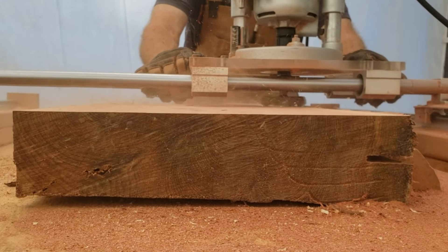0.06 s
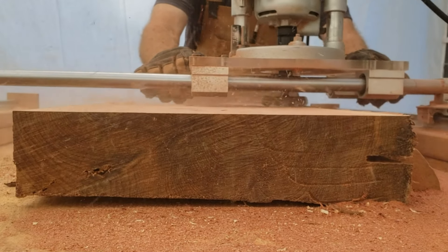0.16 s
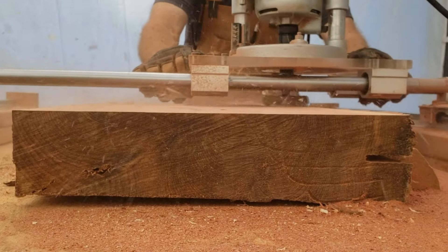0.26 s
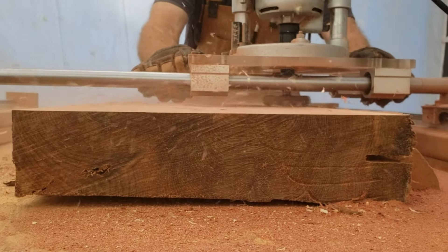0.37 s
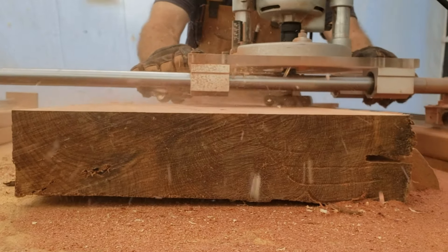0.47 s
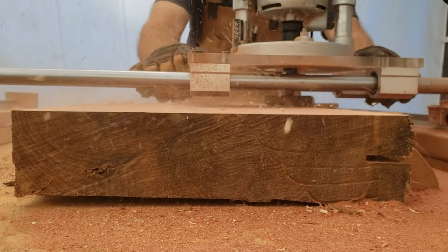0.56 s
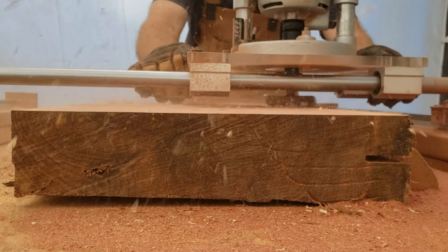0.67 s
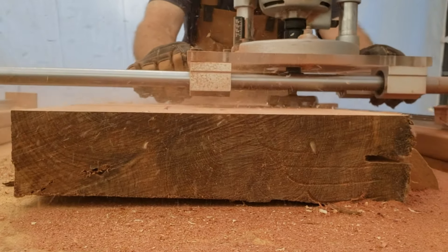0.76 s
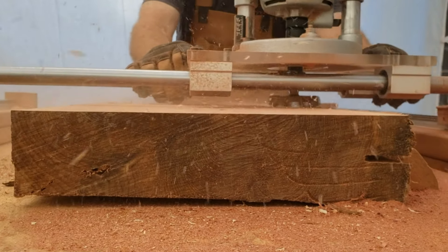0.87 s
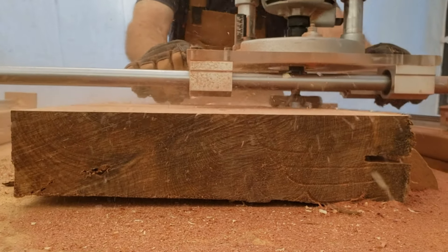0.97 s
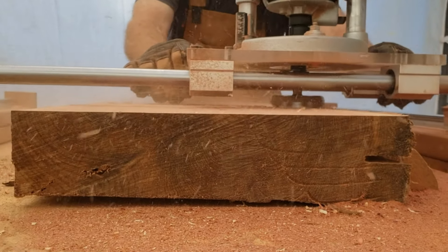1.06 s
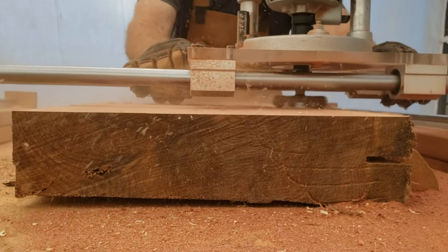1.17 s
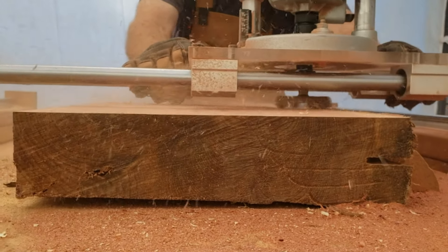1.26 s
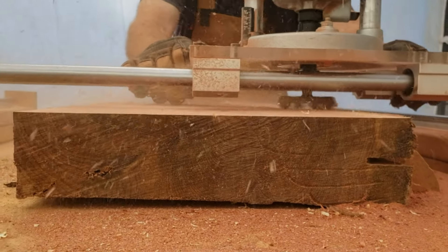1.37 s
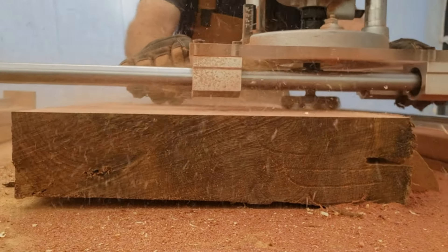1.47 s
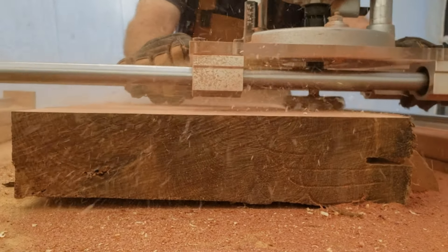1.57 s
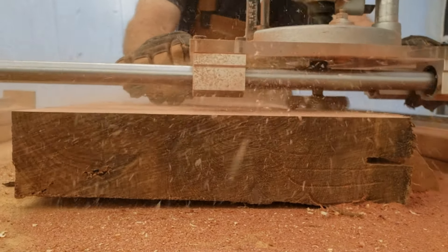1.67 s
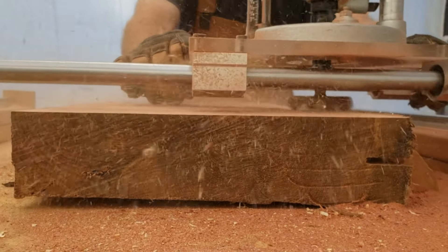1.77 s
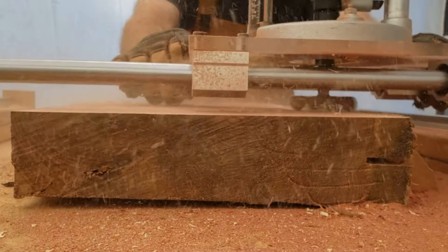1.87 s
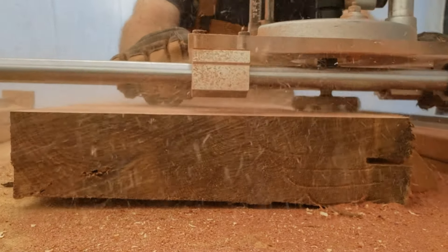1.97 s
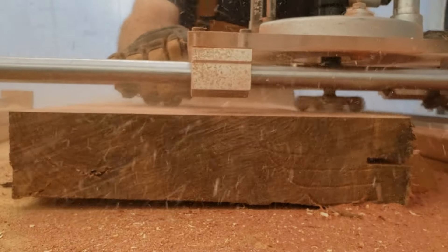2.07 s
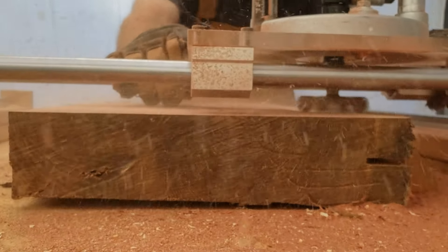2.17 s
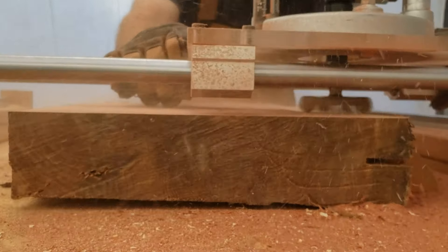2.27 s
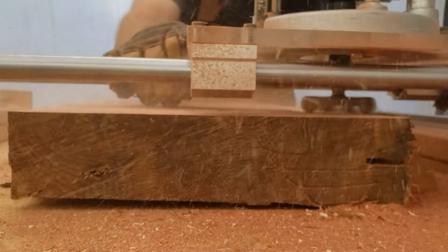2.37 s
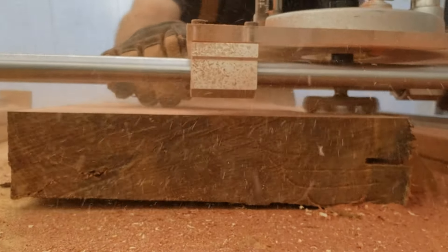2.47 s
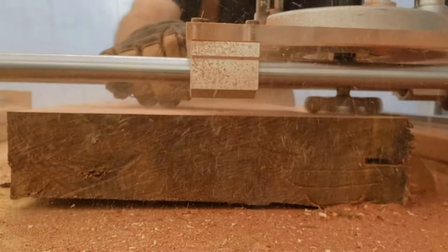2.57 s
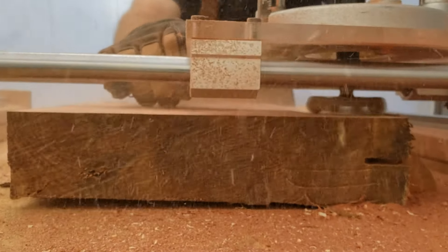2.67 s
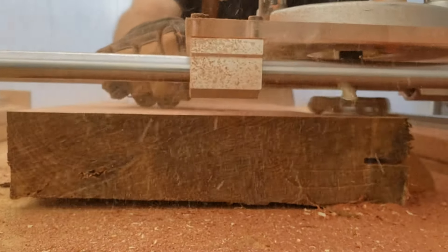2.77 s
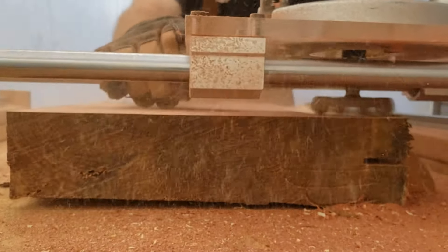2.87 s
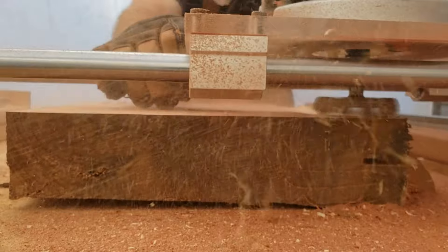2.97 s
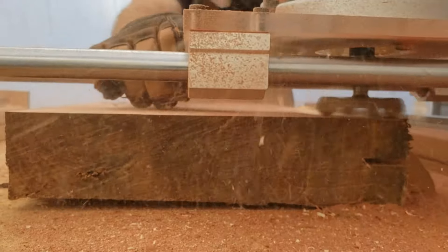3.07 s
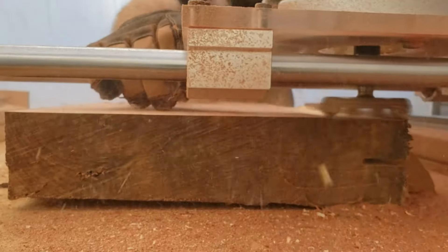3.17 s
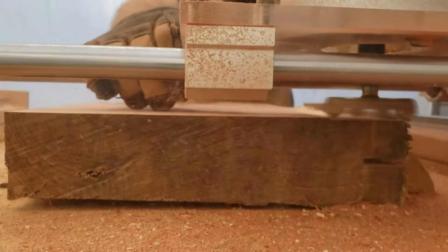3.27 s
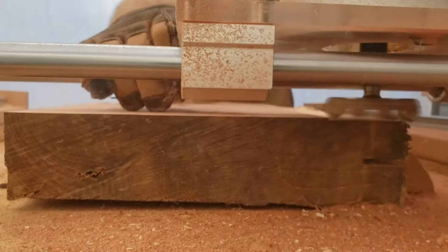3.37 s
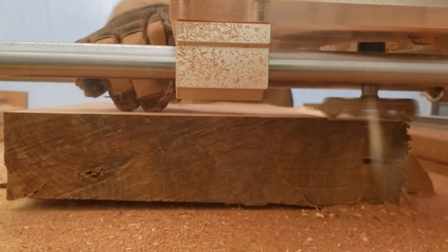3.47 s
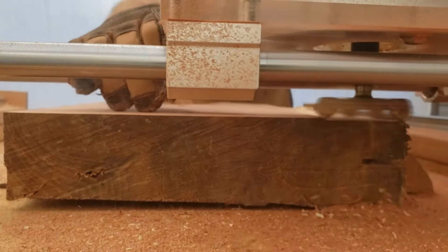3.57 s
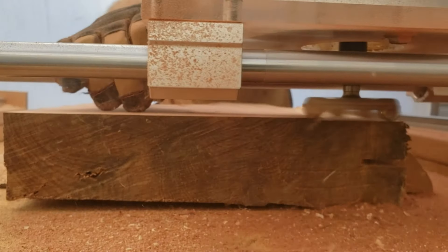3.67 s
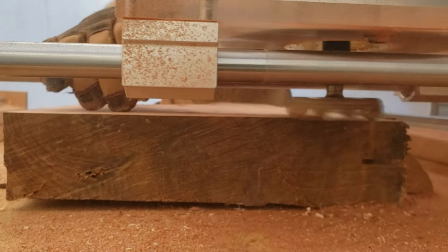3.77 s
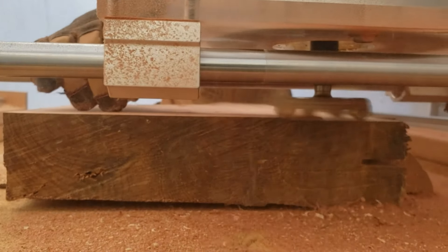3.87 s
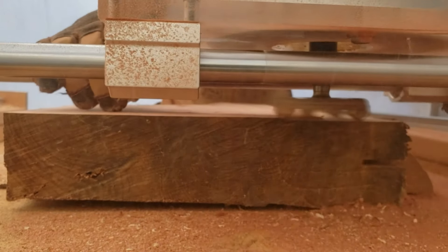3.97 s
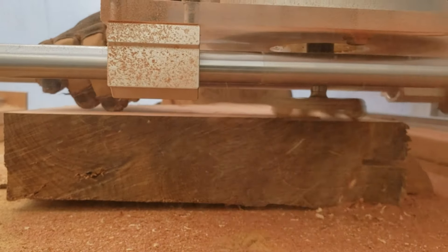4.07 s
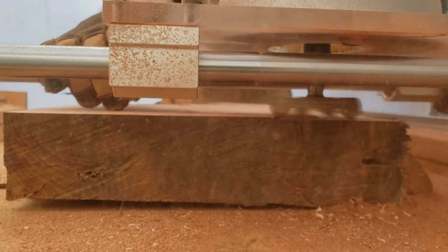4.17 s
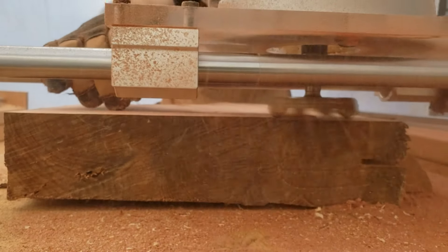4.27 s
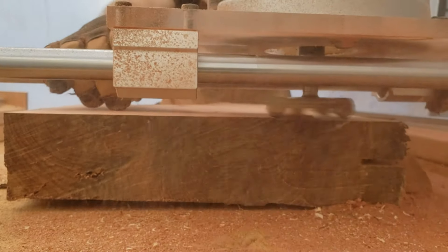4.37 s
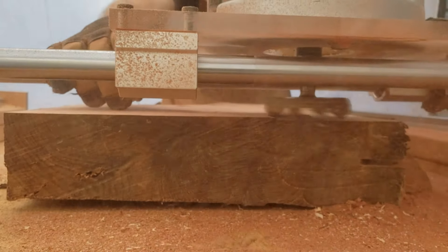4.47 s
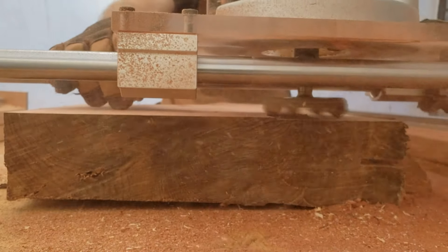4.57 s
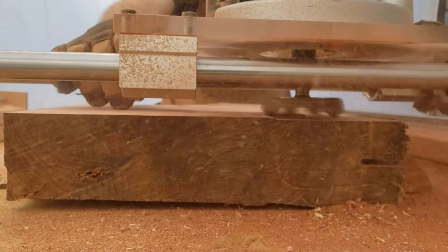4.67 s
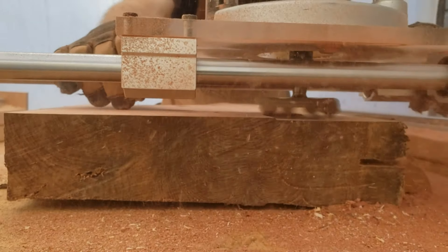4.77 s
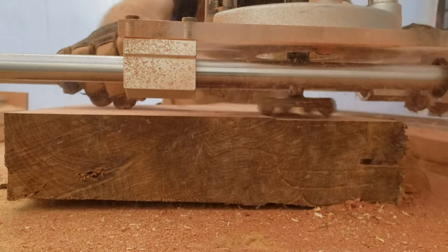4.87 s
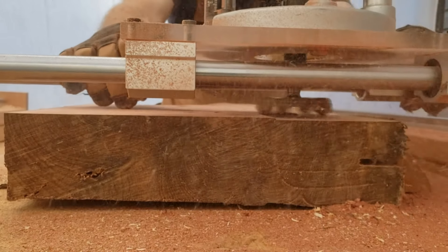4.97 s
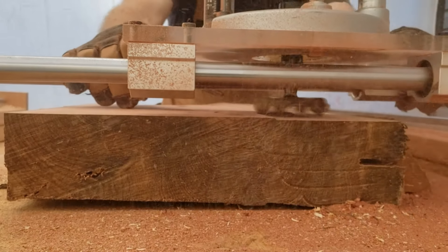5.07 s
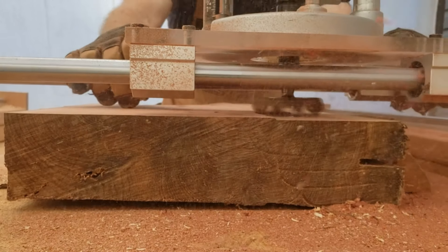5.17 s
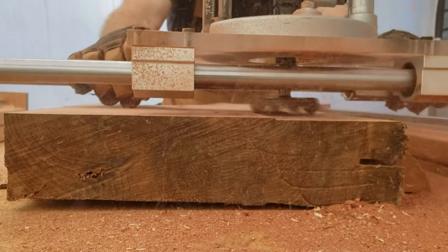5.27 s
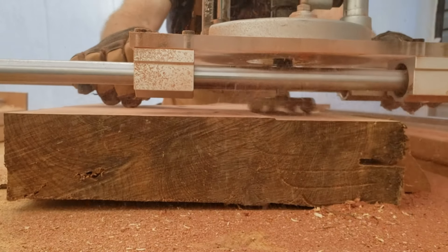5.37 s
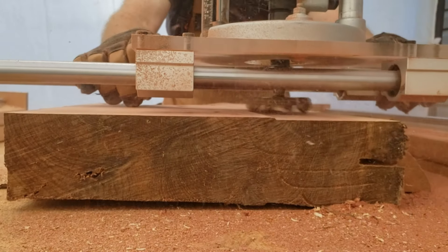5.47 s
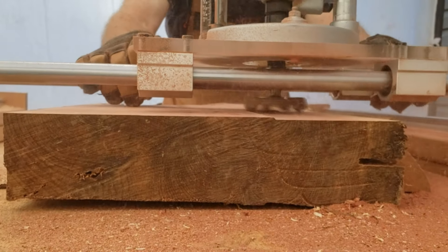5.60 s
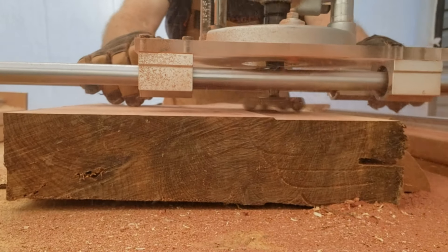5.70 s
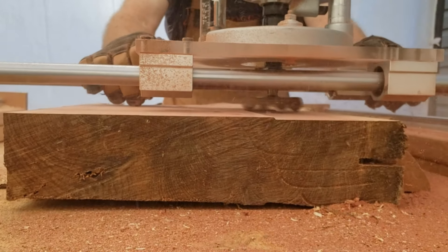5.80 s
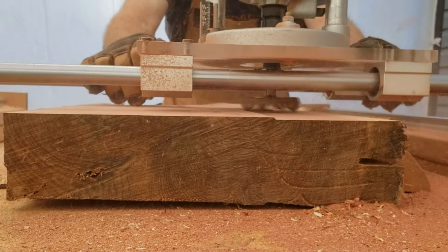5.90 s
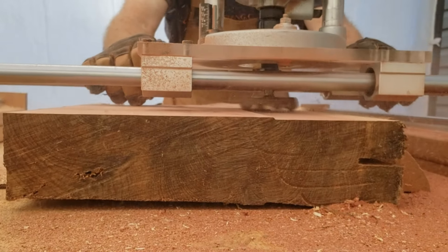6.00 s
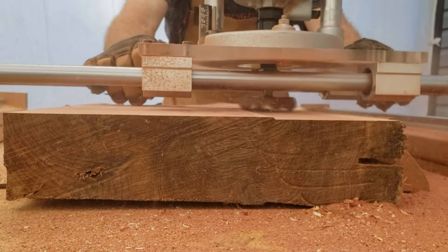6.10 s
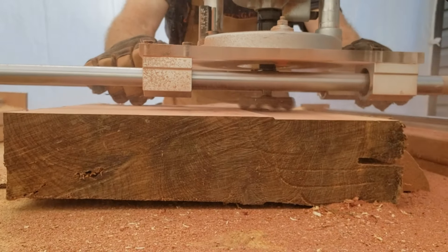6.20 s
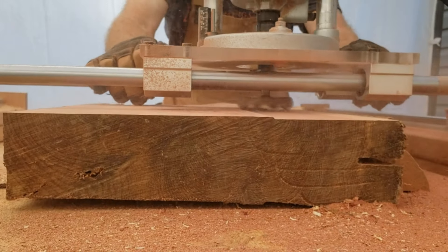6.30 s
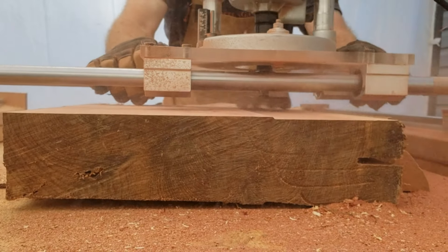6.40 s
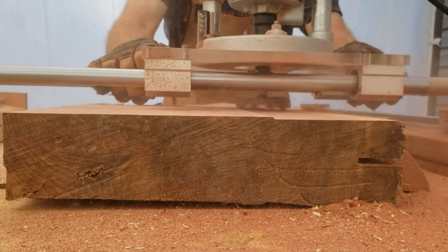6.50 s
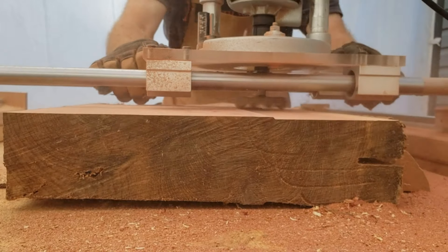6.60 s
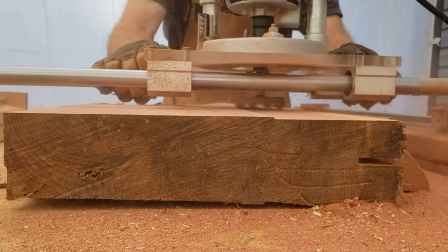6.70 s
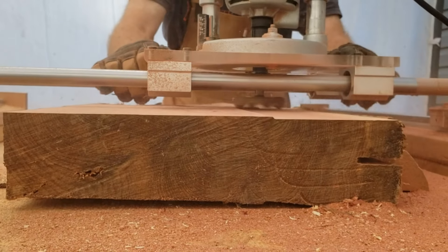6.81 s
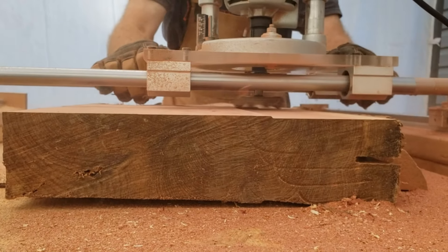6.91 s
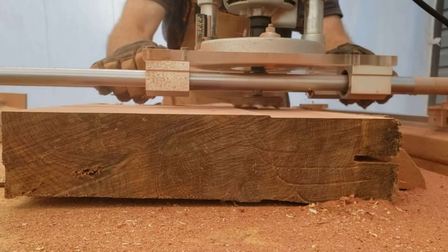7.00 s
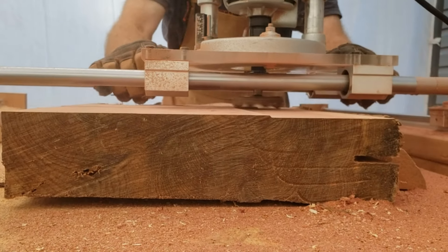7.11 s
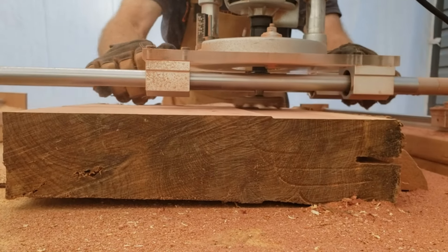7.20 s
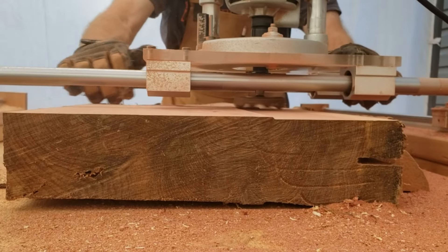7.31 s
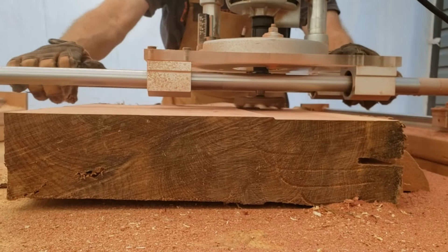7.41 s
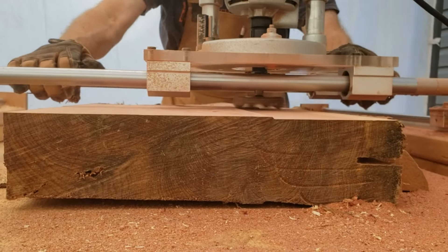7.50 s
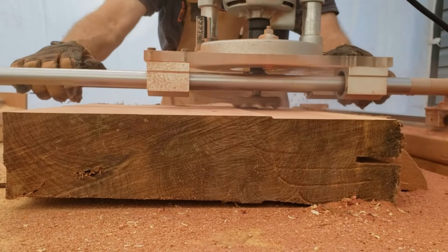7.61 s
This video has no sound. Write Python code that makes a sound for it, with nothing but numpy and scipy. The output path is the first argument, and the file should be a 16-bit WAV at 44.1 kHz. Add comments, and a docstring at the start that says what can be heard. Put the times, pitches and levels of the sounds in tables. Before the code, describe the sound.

A router with a surfacing cutter whines and buzzes across a wooden slab, bogging down, then surging to a blaring tone amid heavy wind buffeting.

```python
"""A plunge router on a rail sled skims a wooden slab with a four-knife surfacing cutter, close by.
It starts in the cut with squeals and chip showers, then bogs down to its lowest pitch near 1.9 s.
Near 3 s the largest shower marks the break through the edge; speed jumps and the knife tone blares.
A strong draught then buffets the left port; from 4.5 s speed sags and the knife tone drops away.
After a brief dip near 6.6 s the spindle runs up again; every tone is a multiple of its speed."""
import sys
import numpy as np
from scipy import signal
from scipy.fft import rfft, irfft, next_fast_len
from scipy.io import wavfile
from scipy.ndimage import uniform_filter1d

SR = 44100
rng = np.random.default_rng(int(sys.argv[2]) if len(sys.argv) > 2 else 0)


def to_wav(sig):
    """Store sig (one row per channel, or 1-D mono) as 16-bit WAV at the path in sys.argv[1].

    Samples outside -1..1 are clipped; the rate is SR.
    """
    pcm = np.clip(np.atleast_2d(sig), -1, 1) * 32767
    pcm = np.round(pcm).astype(np.int16)
    wavfile.write(sys.argv[1], SR, pcm.T)  # frames by channels


N = 337365

# Spindle speed before inertia: [t/s, speed/(turns per s)]
SPINDLE_SPEED = [(0, 249.4), (.24, 251.8), (.42, 247), (.62, 248.3), (.96, 246), (1.28, 248), (1.62, 234),
                 (1.88, 230.1), (2.74, 243.7), (3.1, 245.6), (3.58, 305), (3.72, 310), (4.06, 307.4),
                 (4.3, 301.2), (4.5, 299.2), (5.14, 288), (5.58, 283.9), (5.94, 290.2), (6.36, 295),
                 (6.56, 282.4), (6.76, 285.3), (7.13, 310), (7.65, 312.8)]
INERTIA_S = 0.069   # the rotor rounds off every change of speed
FREE_TURNS_PER_S, FULL_LOAD_SAG_PER_S = 312, 80   # the sag of the speed tells the load
KNIFE_COUNT, FAN_BLADES, MAINS_HZ = 4, 25, 60
CUTOFF_HZ = 15900
PORT_LAG_S = 0.00013   # the right port hears the machine this much later

# How strongly the machine reaches the ports as the sled travels: [t/s, level/dB]
MACHINE_LEVEL = [(0.0, -34), (0.47, -33.5), (0.85, -33.5), (1.77, -33), (2.73, -34.5), (2.81, -34.5),
                 (3.26, -31.5), (3.9, -34), (4.13, -35), (4.22, -34), (4.35, -35.5), (5.5, -39),
                 (5.67, -42.5), (6.86, -37.5), (7.14, -33.5), (7.65, -31)]
# Left-right tilt of broad noise: [f/Hz, left over right/dB]
NOISE_LEAN = [(350, 8), (700, -3.5), (1400, -3.5), (2200, -1.5), (4200, 1.5), (6500, 0), (12000, 0),
              (15000, -5)]

# Draught of the cutter, swinging to the left port in mid-stroke: [t/s, left level/dB, right level/dB]
DRAUGHT_LEVELS = [(0, -30, -32), (.3, -34, -21.5), (.65, -28, -25.5), (1.1, -26, -22), (1.7, -20, -25),
                  (2.3, -15.5, -22.5), (2.75, -15.5, -44), (3.5, -10.5, -51), (4.05, -15.5, -37),
                  (5, -20, -37), (5.47, -26, -22.5), (5.6, -36, -33.5), (5.9, -45, -36), (6.17, -31, -32.5),
                  (6.42, -41, -37), (6.52, -43, -35), (6.9, -35.5, -34), (7.65, -37, -31)]
# Colour of the buffeting: [f/Hz, relative density/dB]
BUFFET_COLOUR = [(15, -28), (28, -27), (40, -7), (62, 0), (100, -3), (160, -8.5), (220, -12.5),
                 (400, -21.5), (800, -31.5), (2500, -79)]
# Single hard eddies on the ports: [t/s, peak level/dB, left over right/dB]
HARD_EDDIES = [(0.272, -18, -11), (.316, -19, -2), (1.126, -14.5, -19), (1.387, -11, 15), (1.591, -16, 8),
               (2.272, -8.5, 19), (4.744, -33, 11), (5.159, -17, 8), (5.399, -17, 6), (6.038, -27, -2),
               (6.16, -21, -1.5), (6.267, -18.5, -4), (6.509, -20, 11), (6.524, -22, -3), (6.589, -32, 0),
               (6.79, -29, 0)]

# Colour of the air churned by the cutter: [f/Hz, relative density/dB]
CHURN_COLOUR = [(100, 1.5), (350, -1.5), (700, -2), (1000, 0.5), (1400, 2.5), (2000, 0), (2900, -4),
                (5000, -26), (8000, -58)]
# Colour of the air rushing through the motor: [f/Hz, relative density/dB]
RUSH_COLOUR = [(300, -37), (700, -15), (1500, -2), (2400, -2), (3200, -0.5), (4200, 0.5), (5500, -0.5),
               (6300, -2.5), (7000, -6), (7700, -17), (8400, -19), (11000, -42)]
# Resonances of the motor housing in the rush: [f/Hz, width/Hz, lift/dB]
HOUSING_RESONANCES = [(470, 90, -21), (1690, 120, 4.5), (2150, 160, 5), (3410, 93, 3.5), (6080, 37, 3.5)]
# Colour of the flying chips: [f/Hz, relative density/dB]
SPRAY_COLOUR = [(3000, -22.5), (6500, -3), (8400, -14), (9300, -8.5), (10200, -4), (11200, -1.5),
                (12000, 1.5), (13200, -3), (14500, -3), (15700, -5.5), (16200, -30)]
# Showers of chips, largest as the cutter breaks through the edge: [t/s, half length/s, level/dB]
CHIP_SHOWERS = [(.43, 0.066, -31), (.63, .06, -29), (1.62, .2, -33), (3.06, 0.093, -22.5),
                (3.24, 0.03, -29)]
# Brush rasp through the main housing resonance: [f/Hz, relative density/dB]
RASP_COLOUR = [(2000, -35), (2650, -14), (2830, -1), (2920, 0), (3060, -6), (3300, -15), (4200, -35)]
# Brush rasp, ahead of a small lift in air(): [t/s, level/dB]
RASP_LEVEL = [(0, -39), (1.1, -39), (1.6, -43), (3.8, -45), (5.7, -42.5), (6.9, -38), (7.3, -33),
              (7.65, -33)]
RUSH_DB = 7   # over the machine level
CHURN_DB, CHURN_FOLLOWS = -2.5, 0.79   # offset; share of the machine level's swing it follows
SPRAY_DB, SPRAY_LOAD_DB = -1, 5.5   # over the machine level; added by full load
SHOWER_CRUNCH_DB = -6   # tearing wood under each shower

# Out-of-balance hum, once a turn: [t/s, level/dB]
HUM_LEVEL = [(0, -25), (1.25, -29), (1.8, -35.5), (2.75, -27), (4.65, -29), (5.05, -33), (5.7, -51.5),
             (6.15, -40), (6.4, -45), (6.68, -31), (6.87, -44), (7.08, -27.5), (7.65, -26)]
# Whine of the motor fan: [t/s, level/dB, left over right/dB]
FAN_WHINE = [(0, -28, 5), (.17, -21, 16), (.45, -28, -7), (.58, -22, -3), (.97, -23.5, 9), (1.1, -31, -2),
             (1.22, -29, -20), (1.5, -35, -5), (1.72, -26.5, -4), (2.2, -26, 6.5), (2.7, -30, -1),
             (2.87, -35.5, 0), (3.15, -29, 4), (3.35, -33, -12), (3.8, -45.5, -2), (4.7, -38, -18),
             (5.5, -37.5, -7), (5.85, -35.5, -2), (6.4, -39.5, -9), (7.3, -37.5, 3), (7.65, -55, 0)]
# Air-vent resonances that swell the fan octave: [f/Hz, width/Hz, lift/dB]
VENT_RESONANCES = [(12370, 300, 10), (15620, 140, 11)]
DRONE_DB, DRONE_LOAD_DB = -17, 6.5   # twice a turn: over the machine level; added by full load
FAN_OCTAVE_DB = -16   # over the machine level
FAN_FADING_DB, FAN_FADES_PER_S = 1.8, 7.0   # shifting reflections, on each side

# Buzz of the cut, played at the nearest half multiple; halves are chatter on every second turn:
# [multiple of spindle speed, relative level/dB]
BITE_PARTIALS = [(6, -21), (9.1, 3.5), (9.77, 6), (10.9, -1), (12.8, 3), (14, -4), (15, -3.5), (17, 1),
                 (19, -25), (21, -5), (3.5, -3.5), (4.5, -2.5), (5.5, -19), (6.5, 2), (7.5, -11), (8.5, -1),
                 (9.5, -7), (11.5, -10)]
# Ringing partials of the cut: [multiple of spindle speed, level running free over machine level/dB,
# added by full load/dB, roughness, wander, left lead/rad, left over right/dB]
RINGING_PARTIALS = [(3, -10, 2, 0.16, 0.17, 0.51, -4), (5, -13, 11.5, 0.25, 0.66, 1.25, -4.5),
                    (7, -14, 12.5, 0.085, 0.29, 1.64, -7.5), (8, -17, 9.5, 0.22, 0.4, 1.26, -18)]
# Resonances of slab and sled that swell partials crossing them: [f/Hz, width/Hz, lift/dB]
SLAB_RESONANCES = [(500.3, 33, 14), (714, 39, 11.5), (1210, 69, 3), (1696, 85, 7.5), (1854, 31, 12),
                   (3000, 57, 6.5), (3625, 28, 13.5)]
BITE_DB, BITE_LOAD_DB = -18, 12.5   # over the machine level; added by full load

# Knives chopping the air, loudest while the cutter overhangs the edge:
# [t/s, level/dB, left over right/dB, octave level/dB]
KNIFE_TONE = [(0, -34, -14, -36), (.25, -27.5, -8, -53), (.44, -34.5, -21, -45), (.66, -26, -18, -47),
              (.88, -40, -19, -48), (1.12, -24.5, -18, -43), (1.55, -36.5, -2, -42), (2.1, -39.5, -3, -59),
              (2.35, -26, 4, -51), (2.6, -26, -4, -49), (3.1, -38, 4, -42), (3.16, -22, -3, -30),
              (3.4, -20, -4, -39), (3.53, -21, -5, -27), (3.85, -15, -3, -26), (4.2, -16, -3, -34),
              (4.3, -29.5, -5, -35.5), (4.42, -15.5, -10, -33), (4.55, -20, -2, -40),
              (4.78, -44.5, -3, -50), (5.8, -44.5, 7, -50), (6.48, -31, -1, -68), (6.62, -41, 3, -60),
              (6.85, -35, 4, -50), (7.15, -42, 2, -40), (7.4, -30, -5, -58), (7.65, -35, -14, -47)]
# High knife overtones: [multiple of spindle speed, relative level/dB]
SING_PARTIALS = [(16, 4), (20, 1), (24, -1), (28, -13), (32, -10), (36, -9), (40, -4), (44, -1), (47, -9),
                 (48, 1), (52, -1), (56, -4), (60, -4)]
# Knife edges squealing in hard grain and along the slab edge: [t/s, half length/s, level/dB]
EDGE_SQUEALS = [(.42, 0.14, -37.5), (.65, .1, -34.5), (3.14, .06, -46), (3.9, 0.49, -41)]
TWELFTH_DB, SING_DB = -4.5, -22   # overtones over the machine level
TWELFTH_SHARE_DB, SING_SHARE_DB = -27, -31   # their part that follows the knife tone


def from_db(db):
    """Decibels to amplitude gain."""
    return 10 ** (np.asarray(db) / 20)


def rms_one(x):
    """Scale a signal to rms 1."""
    return x / np.sqrt(np.mean(x ** 2) + 1e-20)


def in_time(rows):
    """The columns of a curve table, one value a sample."""
    s, *columns = np.transpose(rows)
    return np.squeeze([np.interp(np.arange(N) / SR, s, c) for c in columns])


def drift(rate):
    """Smooth random motion of spread 1 that changes about rate times a second."""
    step = 40   # samples between computed points
    pole = np.exp(-2 * np.pi * rate * step / SR)
    white = rng.standard_normal(N // step + 2002)
    slow = signal.lfilter([1], [1, -2 * pole, pole * pole], white)[2000:]   # skip the filter's start-up
    return np.interp(np.arange(N) / step, np.arange(len(slow)), rms_one(slow))


def two_drifts(rate):
    """Independent drifts for the left and right sides."""
    return np.array([drift(rate), drift(rate)])


def panned(lean_db):
    """Left and right gains of mean power 1."""
    gains = from_db(np.array([[.5], [-.5]]) * lean_db)
    return gains / np.sqrt(np.mean(gains ** 2, axis=0))


def swells(rows):
    """Gain of a table of bell-shaped swells."""
    t = np.arange(N) / SR
    return sum(from_db(db) * np.exp(-((t - s) / half_s) ** 2) for s, half_s, db in rows)


def lift_db(resonances, hz):
    """What a set of resonances adds in dB at a frequency."""
    return sum(lift / (1 + (2 * (hz - centre) / width) ** 2) for centre, width, lift in resonances)


def noise(spectrum, alike, lean=NOISE_LEAN, resonances=(), lag_s=0):
    """Coloured stereo noise of rms 1; the alike share of power reaches the right port lag_s later."""
    size = next_fast_len(N)
    hz = np.arange(size // 2 + 1) * SR / size

    def along(points):
        point_hz, db = np.transpose(points)
        return np.interp(np.log(hz + 1), np.log(point_hz), db)

    colour_db = along(spectrum) + lift_db(resonances, hz)
    white = rfft(rng.standard_normal((3, size)))
    shared = white[2] * np.exp(-2j * np.pi * np.outer([0, lag_s], hz))
    both = np.sqrt(alike) * shared + np.sqrt(1 - alike) * white[:2]
    coloured = both * from_db(colour_db) * panned(along(lean))
    return rms_one(irfft(coloured, size)[:, :N])


def partial(angle, order, rough, wander, lead=0):
    """One multiple of the spindle: turbulence roughens it, shifting reflections move it on each side."""
    heard = order * np.gradient(angle) * SR / (2 * np.pi) < CUTOFF_HZ
    flutter = rough * drift(31)
    phase = (order * angle + rough * drift(19)) % (2 * np.pi)
    sides = []
    for ahead in (lead, 0):
        strength = 1 + flutter + wander * drift(2.5)
        side_phase = phase + ahead + wander * drift(6.3)
        sides.append(strength * np.sin(side_phase.astype("float32")))
    return rms_one(np.array(sides)) * heard


def stack(angle, orders, rough, wander, scatter):
    """Several partials; each leads on the left by the port lag, give or take what reflections add."""
    lead_per_order = PORT_LAG_S * SR * angle[-1] / N   # radians at the mean spindle speed
    total = 0
    for multiple, db in orders:
        lead = multiple * lead_per_order + scatter * rng.normal()
        half_order = np.round(2 * multiple) / 2
        total = total + from_db(db) * partial(angle, half_order, rough, wander, lead)
    return total


def draught(gust_db=2.0):
    """Eddies hit each port separately, in lumps and gusts; the microphones pass little of the deepest part."""
    gusts = gust_db * np.array([drift(4.9), drift(10)])
    level_db = in_time(DRAUGHT_LEVELS) + gusts
    lumps = from_db(3.6 * two_drifts(16))
    eddies = noise(BUFFET_COLOUR, alike=0.033, lean=[(60, 0), (800, 0)]) * lumps
    eddies = signal.sosfilt(signal.butter(2, 34, "high", fs=SR, output="sos"), eddies)
    # the steady flow keeps their strength even from one moment to the next
    strength = np.sqrt(uniform_filter1d(eddies ** 2, size=SR // 6, axis=1) + 1e-9)
    pressure = from_db(level_db) * eddies / strength
    # the hardest lumps are rounded off
    return .75 * np.tanh(pressure / .75)


def thumps(width_s=.0013):
    """A hard eddy is one push of pressure with a shallow suction on either side."""
    out = np.zeros((2, N))
    for s, peak_db, lean_db in HARD_EDDIES:
        u = np.clip((np.arange(N) / SR - s) / width_s, -10, 10)
        push = (1 - u ** 2) * np.exp(-u ** 2 / 2)
        out += from_db(peak_db) * push * panned(lean_db)
    return out


def air(angle, load, level_db):
    """The cutter churns air, the motor's rush pulses at twice the mains, brushes rasp and knives throw chips."""
    mains = np.cos(2 * np.pi * 2 * MAINS_HZ * np.arange(N) / SR)
    feed_db = .4 * drift(6)   # an uneven feed makes the hiss swell and sink slightly
    showers = swells(CHIP_SHOWERS)

    steady_churn = from_db(CHURN_DB + CHURN_FOLLOWS * level_db)
    churn_gain = np.hypot(steady_churn, from_db(SHOWER_CRUNCH_DB) * showers)
    churn = churn_gain * noise(CHURN_COLOUR, alike=0.48, lag_s=PORT_LAG_S)

    rush = noise(RUSH_COLOUR, alike=0.013, resonances=HOUSING_RESONANCES) * (1 + 0.065 * mains)
    rush = from_db(level_db + RUSH_DB + feed_db) * rush

    crackle = rms_one(from_db(2.8 * drift(40)))
    rasp = from_db(in_time(RASP_LEVEL) + .7) * noise(RASP_COLOUR, alike=.55) * crackle

    # chips pulse once a turn and at each knife
    pulses = 1 + 0.044 * np.cos(angle) + 0.1 * np.cos(KNIFE_COUNT * angle)
    grains = rms_one(from_db(1.1 * drift(200)) * pulses)
    steady_spray = from_db(level_db + SPRAY_DB + SPRAY_LOAD_DB * load + feed_db)
    spray = np.hypot(steady_spray, showers) * noise(SPRAY_COLOUR, alike=0.011) * grains
    return churn + rush + rasp + spray


def motor(angle, speed, load, level_db):
    """Unbalance shakes the sled once and twice a turn; the fan blades whine, with a faint octave."""
    hum = from_db(in_time(HUM_LEVEL)) * partial(angle, order=1, rough=0.13, wander=0.017)
    drone_db = level_db + DRONE_DB + DRONE_LOAD_DB * load + lift_db(SLAB_RESONANCES, 2 * speed)
    drone = from_db(drone_db) * partial(angle, order=2, rough=0.028, wander=0.17)
    shake = (hum + drone) * panned(lean_db=-2.0)

    whine_db, lean_db = in_time(FAN_WHINE)
    fading = rms_one(from_db(FAN_FADING_DB * two_drifts(FAN_FADES_PER_S)))
    fan = partial(angle, FAN_BLADES, rough=.19, wander=.22, lead=.6)
    whine = from_db(whine_db) * fan * fading * panned(lean_db)

    octave_db = level_db + FAN_OCTAVE_DB + lift_db(VENT_RESONANCES, 2 * FAN_BLADES * speed)
    octave = from_db(octave_db) * partial(angle, 2 * FAN_BLADES, rough=0.19, wander=.2, lead=0.98)
    return shake + whine + octave


def cut(angle, speed, load, level_db):
    """Unequal bites fill in the other multiples as the load grows; a few ring in the slab."""
    buzz = stack(angle, BITE_PARTIALS, rough=.27, wander=.55, scatter=1.0)
    out = from_db(level_db + BITE_DB + BITE_LOAD_DB * load) * buzz * panned(lean_db=-6.0)
    for order, free_db, load_db, rough, wander, lead, lean_db in RINGING_PARTIALS:
        ring_db = level_db + free_db + load_db * load + lift_db(SLAB_RESONANCES, order * speed)
        out = out + from_db(ring_db) * partial(angle, order, rough, wander, lead) * panned(lean_db)
    return out


def knives(angle, speed, level_db):
    """Four knives a turn give a tone and octave; overtones follow, and the highest squeal in hard grain."""
    knife_db, lean_db, octave_db = in_time(KNIFE_TONE)

    def overtone_gain(own_db, share_db):
        return np.hypot(from_db(level_db + own_db), from_db(knife_db + share_db))

    tone = partial(angle, KNIFE_COUNT, rough=.07, wander=.05, lead=.8)
    tone = from_db(knife_db) * tone * panned(lean_db)
    octave = partial(angle, 2 * KNIFE_COUNT, rough=0.27, wander=0.29, lead=1.38)
    octave = from_db(octave_db) * octave * panned(lean_db=-4)

    slab_gain = from_db(lift_db(SLAB_RESONANCES, 3 * KNIFE_COUNT * speed))
    twelfth = partial(angle, 3 * KNIFE_COUNT, rough=0.49, wander=0.46, lead=2.64)
    twelfth = overtone_gain(TWELFTH_DB, TWELFTH_SHARE_DB) * slab_gain * twelfth * panned(lean_db=-7.5)

    sing_gain = np.hypot(overtone_gain(SING_DB, SING_SHARE_DB), swells(EDGE_SQUEALS))
    sing = sing_gain * stack(angle, SING_PARTIALS, rough=.28, wander=.45, scatter=1.4)
    return tone + octave + twelfth + sing


def scene():
    """The spindle's speed sets every machine pitch and tells the load; one level carries the machine."""
    speed = uniform_filter1d(in_time(SPINDLE_SPEED), size=int(INERTIA_S * SR))
    speed = speed * (1 + 0.000487 * drift(10.5))   # slight unsteadiness
    angle = 2 * np.pi * np.cumsum(speed) / SR
    load = (FREE_TURNS_PER_S - speed) / FULL_LOAD_SAG_PER_S
    level_db = in_time(MACHINE_LEVEL)
    background = draught() + thumps() + air(angle, load, level_db)
    tones = motor(angle, speed, load, level_db) + cut(angle, speed, load, level_db)
    return background + tones + knives(angle, speed, level_db)


def record(dry):
    """Full scale bounds the peaks; then the top is cut steeply."""
    steep_lowpass = signal.ellip(12, .1, 80, CUTOFF_HZ, fs=SR, output="sos")
    return signal.sosfilt(steep_lowpass, np.clip(dry, -1, 1))


dry = scene()
out = record(dry)
to_wav(out)
```